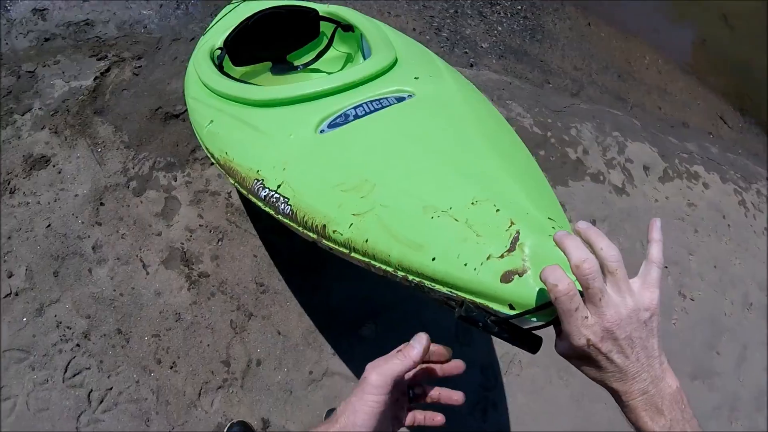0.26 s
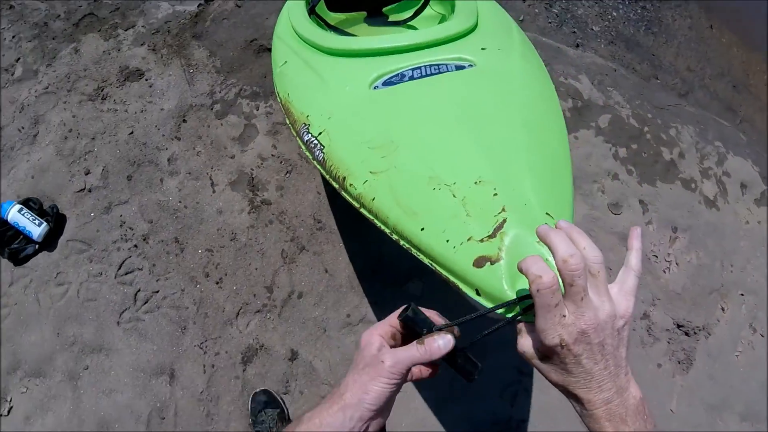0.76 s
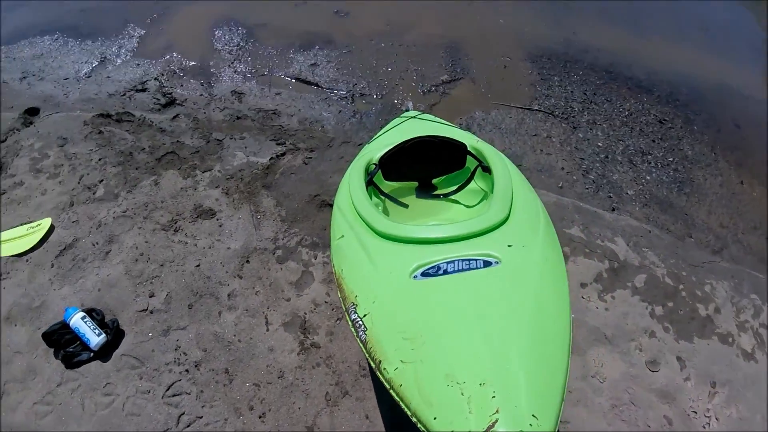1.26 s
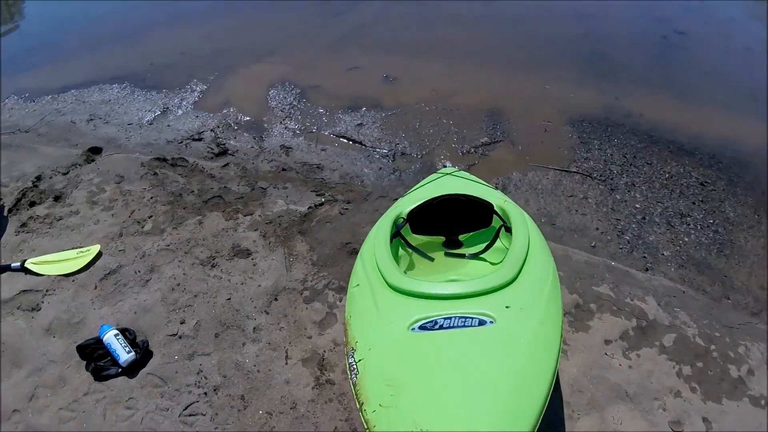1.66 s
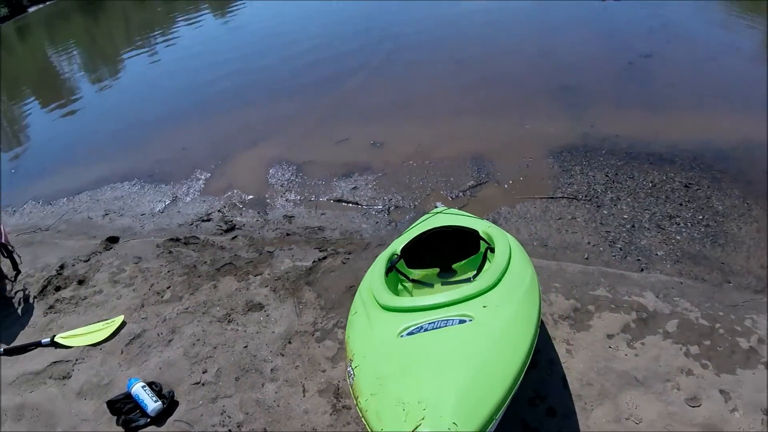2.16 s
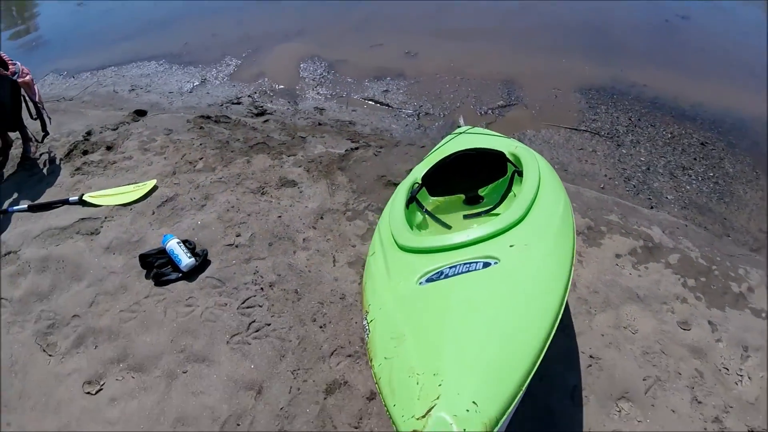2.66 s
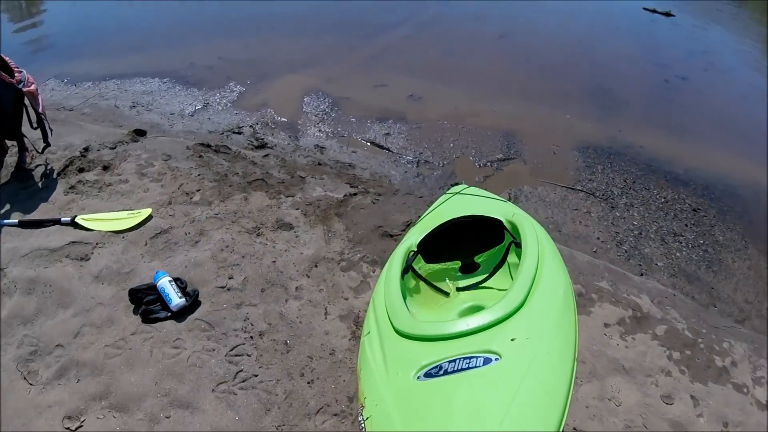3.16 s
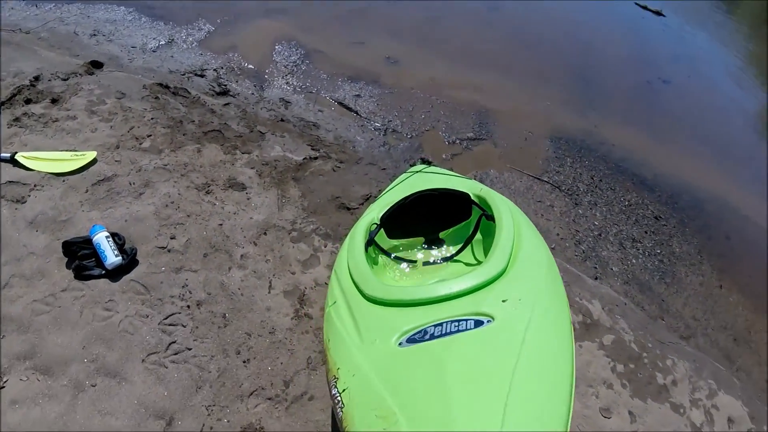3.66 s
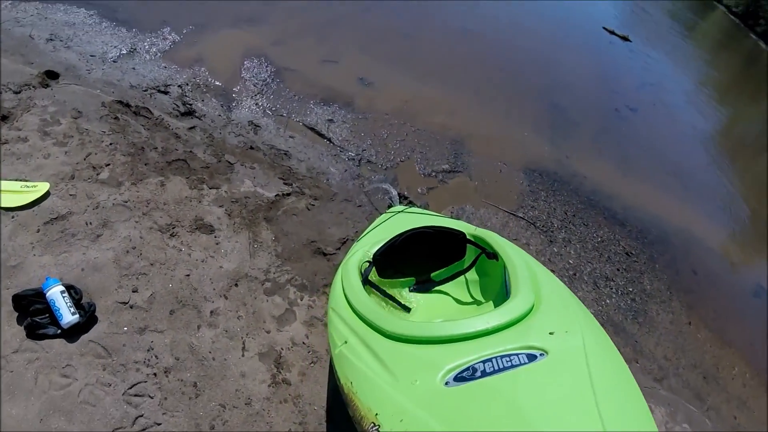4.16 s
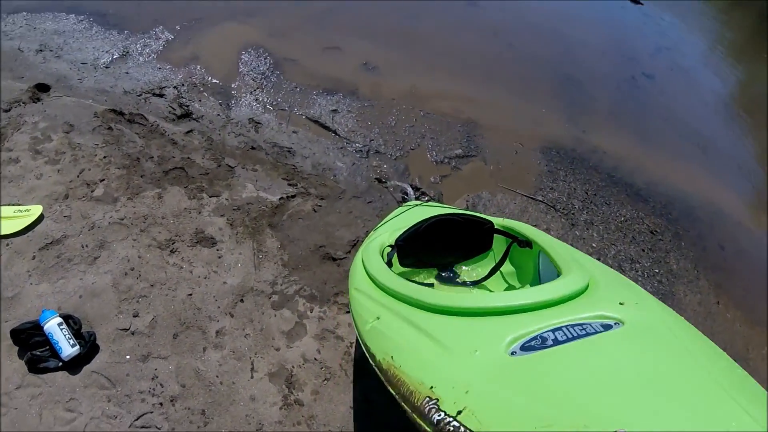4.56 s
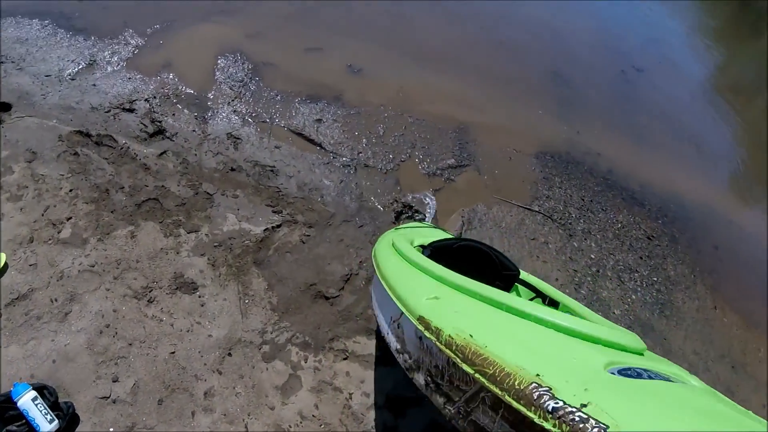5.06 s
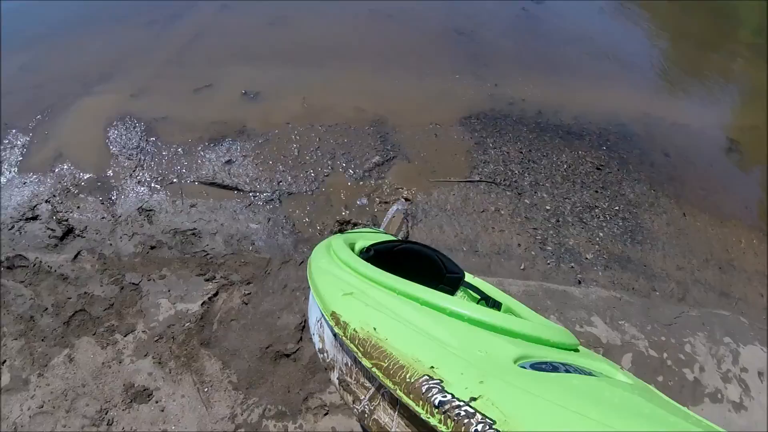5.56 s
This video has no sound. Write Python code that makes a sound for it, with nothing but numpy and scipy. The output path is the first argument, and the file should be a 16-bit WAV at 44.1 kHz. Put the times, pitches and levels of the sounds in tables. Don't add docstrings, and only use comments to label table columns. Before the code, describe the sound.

Quiet drips and soft wind give way to sharp hollow plastic knocks, short sand hisses and a patter of water off a boat hull.

```python
import sys
import numpy as np
from scipy import signal
from scipy.fft import rfft, irfft, next_fast_len
from scipy.io import wavfile
from scipy.ndimage import map_coordinates

SR = 44100
rng = np.random.default_rng(int(sys.argv[2]) if len(sys.argv) > 2 else 0)


def unload_audio(sound):
    columns = np.transpose(np.atleast_2d(sound))
    steps = np.round(np.clip(columns, -1, 1) * 32767)
    wavfile.write(sys.argv[1], SR, steps.astype(np.int16))


def gain_from_decibels(decibels):
    exponent = np.asarray(decibels, float) / 20
    return 10 ** exponent


N = 255824
TIME = np.arange(N) / SR

# start in seconds, length in seconds, grit in dB, groan over grit in dB.
SLIDES = [(1.9, .01, -70, 5), (2.625, .26, -44.5, -4), (3.094, 0.011, -46.5, -1.5), (3.204, 0.12, -51, 1.5),
          (3.401, 0.034, -54.5, 9.5), (3.492, 0.023, -47, -16), (3.608, 0.16, -70, 18.5),
          (3.864, 0.023, -52.5, -1), (4.095, 0.019, -56, 7), (4.246, 0.061, -45.5, 0),
          (4.376, .14, -50, 8.5), (4.58, 0.054, -49, 3), (4.742, 0.07, -52, -24), (4.9, 0.072, -58.5, 10),
          (5.02, 0.057, -58, 3.5), (5.156, 0.071, -54.5, 1), (5.334, 0.11, -51.5, 2),
          (5.501, 0.056, -52.5, 7.5), (5.64, .2, -55.5, -7)]
# frequency in Hz, density in dB per Hz.
GRIT_COLOUR = [(200, -42), (500, -33), (1000, -3.5), (2300, 5), (3000, 1.5), (4000, 3.5), (6000, -3.5),
               (9000, -9.5), (15000, -19)]
# frequency in Hz, density in dB per Hz.
GROAN_COLOUR = [(100, -27), (250, 5), (550, -4), (1000, -4.5), (2000, -10.5), (5000, -45)]
# start in seconds, peak in dB, crack in dB.
BLOWS = [(0.023, -40, -5), (2.917, -31, -23.5), (3.086, -31, -16), (3.208, -37.5, -5), (3.3765, -35, -16.5),
         (3.418, -33, -42), (3.482, -35, -6), (3.543, -35, -19), (3.6416, -11.5, -1.5),
         (3.6455, -15, -16.5), (3.653, -19, -7), (3.664, -24.5, -14), (3.755, -32, -23.5),
         (3.861, -28.5, -20.5), (3.874, -26.5, -18.5), (4.0028, -21, -14.5), (4.011, -32, -12),
         (4.105, -21.5, -19), (4.27, -24.5, -21), (4.314, -22.5, -23.5), (4.359, -21, -20.5),
         (4.399, -20.5, -18.5), (4.419, -28.5, -27.5), (4.493, -33.5, -35), (4.615, -24.5, -16),
         (4.629, -33.5, -18), (4.78, -23.5, -14), (5.1413, -24.5, -10), (5.2016, -23.5, -23),
         (5.497, -38, -5)]
# pitch in Hz, width in Hz, level in dB.
HULL_MODES = [(230, 117, -3.5), (321, 22.7, 8), (452, 108, 2), (605, 73, 4.5), (733, 91, 0.5),
              (1126, 310, -2.5), (1347, 89, 2.5), (1800, 330, -7.5), (2320, 590, -8.5), (4070, 1350, -12.5)]
# start in seconds, peak in dB, pitch in Hz.
CLEAR_DRIPS = [(0.0616, -41, 2130), (0.1166, -37.5, 2200), (0.1414, -41, 2190), (0.223, -35.5, 3880),
               (0.289, -44, 2760), (0.415, -39, 3500), (0.7696, -39, 3680), (0.817, -40, 1710),
               (0.8748, -31.5, 3000), (0.9154, -41, 2550), (1.077, -38, 3540), (1.7987, -38.5, 3400),
               (1.8118, -39, 2620), (3.306, -31, 2250), (4.1926, -31.5, 1830), (4.4963, -31, 1990),
               (4.62, -28, 2700), (4.65, -28, 2750), (4.9716, -33, 2050), (5.0474, -33.5, 2920),
               (5.0744, -26.5, 3200), (5.1678, -28, 3430), (5.2615, -31, 3700), (5.3672, -29.5, 2200),
               (5.45, -28, 3330), (5.4979, -28, 2620), (5.5796, -28, 3050), (5.6168, -26.5, 3350),
               (5.6605, -29.5, 1450), (5.699, -28.5, 2150)]
# start in seconds, peak in dB, pitch in Hz.
FINE_DROPS = [(0.2952, -41, 4300), (0.4623, -45, 3450), (0.5112, -40.5, 3500), (0.75, -39.5, 4400),
              (1.1313, -43, 2500), (1.3239, -40, 3140), (0.889, -38, 4300), (0.036, -40, 4570),
              (1.8926, -43, 3280), (3.0878, -28.5, 5930), (3.4148, -33, 1800), (5.1835, -36, 1540),
              (5.2075, -38, 2600), (0.486, -44, 3700), (1.33, -42.5, 4800), (3.214, -32, 3300),
              (3.486, -36, 3200), (4.2028, -37.5, 3430), (4.6693, -36.5, 3800), (4.7364, -31.5, 3670),
              (4.7582, -36, 2270), (5.3877, -33, 3730), (5.4216, -33, 3440), (5.467, -29.5, 3600),
              (5.5164, -32, 6400), (5.636, -44, 3200), (5.672, -42, 3500), (5.737, -34, 2360),
              (5.7643, -36, 3380), (5.7723, -36, 6500)]
# start in seconds, peak in dB, pitch in Hz, life in cycles.
CASE_PINGS = [
    (5.366, -25, 10600, 22),
    (5.465, -32, 8000, 18),
    (1.155, -36, 11500, 20),
]
# time in seconds, bubble peak in dB.
TRICKLE_FLOW = [(0, -44), (.55, -46), (1.4, -48.5), (2.2, -53.5), (3, -59), (3.3, -44.5), (3.7, -49),
                (4.4, -44.5), (4.65, -40), (4.9, -46), (5.3, -43), (5.5, -38), (5.68, -34.5), (5.8, -41)]
# start in seconds, length in seconds, level in dB.
HULL_HEAVES = [
    (.55, .5, -58.5),
    (2.68, 0.057, -43),
    (3.2, 0.11, -46),
    (3.64, 0.071, -45.5),
    (3.86, 0.051, -36.5),
    (4.28, 0.12, -43),
    (4.55, 0.08, -44.5),
    (4.8, 0.76, -48),
    (5.62, .1, -57),
]
# frequency in Hz, density in dB per Hz.
BOOM_COLOUR = [(40, -18), (70, -0.5), (116, 2.5), (160, -5), (240, -12), (400, -34.5), (900, -86)]
# start in seconds, length in seconds, level in dB.
WIND_PUFFS = [(0, 0.048, -34), (.08, 0.13, -44), (.29, 0.08, -42.5), (.6, 0.089, -46.5),
              (.83, 0.063, -43.5), (1.09, 0.13, -41), (1.38, 0.048, -43), (1.58, .18, -47),
              (1.89, 0.17, -47), (2.38, 0.02, -39.5), (2.53, 0.39, -41.5), (3.45, 0.13, -51),
              (4.33, .08, -55), (5, .5, -51), (5.76, .04, -54)]
# frequency in Hz, density in dB per Hz.
BUFFET_COLOUR = [(15, -11), (25, 4.5), (45, 2.5), (70, -4), (110, -18.5), (300, -35), (600, -94)]
# centre in seconds, peak in dB, width in seconds.
PRESSURE_DIPS = [
    (2.745, -26.5, 0.0081),
    (3.884, -43, 0.003),
]
# frequency in Hz, density in dB per Hz.
RIVER_COLOUR = [(150, -4), (250, -4), (400, -7), (1100, -6), (2200, -13.5), (3700, -16.5), (4400, -22.5),
                (5600, -25.5), (6450, -15.5), (7100, -20.5), (8800, -23.5), (10300, -32), (11200, -30),
                (13000, -30.5), (14400, -49)]
# frequency in Hz, gain in dB.
CASE_TONE = [(20, 2.5), (4000, -1), (4900, -5.5), (5800, 0.5), (6400, 6.5), (7000, -7.5), (8300, -9.5),
             (10300, -16), (11000, -5.5), (12000, -37), (16000, -50)]


def drag():
    timing = dict(rise_s=0.016, rise_share=1.84, fall_s=0.075)
    slide = swells([row[:3] for row in SLIDES], rest_db=-63, **timing)
    groan_rows = [(s, length, db + more_db) for s, length, db, more_db in SLIDES]
    load = swells(groan_rows, rest_db=-54, **timing)
    moving = np.clip((TIME - 1.9) / 0.39, 0, 1)
    grit = slide * rush(GRIT_COLOUR, lumps_db=0.8, rate=70, spiky=2.5)
    groan = gain_from_decibels(-2) * load * rush(GROAN_COLOUR, lumps_db=1.5, rate=35, spiky=3.0)
    return moving * (grit + groan) + pebble_slips(load)


def pebble_slips(load):
    chance = rng.random((1000, 4))
    s = 2.9 + 2.85 * chance[:, 0]
    db = 20 * np.log10(load[(s * SR).astype(int)]) + 2 - 3 * np.log(chance[:, 1] + 0.03)
    pitch = 350 * 8 ** chance[:, 2]
    cycles = 2.5 + 5 * chance[:, 3]
    return bubbles(s, db - 4 * np.log2(pitch / 500), pitch, cycles, 0 * s)


def knocks():
    out = np.zeros(N + SR)
    t = np.arange(SR // 6) / SR
    for s, db, crack_db in BLOWS:
        body = hull_ring(t, crack_db)
        contact_s = 0.001 * gain_from_decibels(-0.35 * (crack_db + 10.5))
        contact_db = np.minimum(2 + 0.35 * (crack_db + 6), 4)
        contact = -gain_from_decibels(contact_db) * np.sin(2 * np.pi * np.minimum(t / contact_s, 1))
        crack = rng.standard_normal(len(t)) * (gain_from_decibels(-60 * t / 0.0048) + 0.02 * gain_from_decibels(-60 * t / 0.013))
        crack[:4] = [-2, -3, 1, 3]
        blow = body / np.abs(body).max() + contact + gain_from_decibels(crack_db + 3.5) * crack
        out[round(s * SR) + 50:][:len(t)] += gain_from_decibels(db) * blow
    return out[:N]


def hull_ring(t, crack_db):
    ring_s = 0.091
    ragged = rng.standard_normal(len(t)) * gain_from_decibels(3.5 * np.repeat(rng.standard_normal(len(t) // 50), 50))
    push_level = 1.82 * gain_from_decibels(-2.3 * (crack_db + 20))
    push = -push_level * np.sin(np.pi * np.minimum(t / 0.00039, 1))
    body = np.zeros(len(t))
    for k, (centre, width, db) in enumerate(HULL_MODES):
        decay = gain_from_decibels(-60 * t / ring_s * (centre / 700) ** 0.23)
        rattle = 1.01 * ragged * np.minimum(t / 0.002, 1) * decay
        gain = (-1) ** k * gain_from_decibels(db + rng.normal(0, 2.13))

        def mode(hz):
            return gain * 1j * hz * width / (centre ** 2 - hz ** 2 + 1j * hz * width)

        body += filtered(push + rattle, mode)
    return body


def water():
    return drips() + spray() + shaken_off() + trickle()


def drips():
    s, db, hz = np.transpose(CLEAR_DRIPS)
    chance = rng.random((len(s), 2))
    ring = bubbles(s, db + 0.5, hz, 13.7 * (0.7 + 0.6 * chance[:, 0]), 0.3 * chance[:, 1])
    slap = bubbles(s - 0.001, db - 1, 1.45 * hz, 2 + 0 * s, 0 * s)
    return ring + slap


def spray():
    s, db, hz = np.transpose(FINE_DROPS)
    chance = rng.random((len(s), 2))
    drops = bubbles(s, db + 7, hz, 3 + 8 * chance[:, 0], 0.69 * chance[:, 1])
    return drops + bubbles(*np.transpose(CASE_PINGS), np.zeros(len(CASE_PINGS)))


def shaken_off():
    s, db, crack_db = np.transpose(BLOWS)
    chance = rng.random((len(s), 4))
    drip_hz = 1600 * (0.81 + 0.5 * chance[:, 0])
    drip = bubbles(s + 0.00292, db - 5, drip_hz, 5 + 0 * s, 0.42 * chance[:, 1])
    drop_hz = 3500 * (0.79 + 0.13 * chance[:, 2])
    drop_db = db + crack_db / 2 + 3
    return drip + bubbles(s + 0.00198, drop_db, drop_hz, 3 + 6 * chance[:, 3], 0.3 * chance[:, 1])


def trickle():
    flow_db = np.interp(TIME, *np.transpose(TRICKLE_FLOW))
    rate = 300 * gain_from_decibels(0.9 * (flow_db + 45))
    start = np.nonzero(np.diff(np.floor(np.cumsum(rate / SR))))[0]
    chance = rng.random((len(start), 5))
    scatter = (chance[:, 0] - 0.5) * 6 * SR / rate[start]
    start = np.clip(start + scatter, 0, N - 1).astype(int)
    tick = chance[:, 4] < 0.55
    pitch = 1200 * 3.7 ** chance[:, 1] * np.where(tick, 1.5, 1)
    db = flow_db[start] - 2.6 * np.log(chance[:, 2] + 0.03) + 2 * tick
    cycles = np.where(tick, 2 + 2 * chance[:, 3], 3 + 9 * chance[:, 3] ** 2)
    return bubbles(start / SR, db, pitch, cycles, 0.9 * chance[:, 4] ** 3)


def boom():
    gain = swells(HULL_HEAVES, rest_db=-49.5, rise_s=0.01, rise_share=0.12, fall_s=0.1)
    return gain * rush(BOOM_COLOUR, lumps_db=1.0, rate=30)


def wind():
    gain = swells(WIND_PUFFS, rest_db=-50.5, rise_s=0.022, rise_share=0.12, fall_s=0.077)
    out = gain * rush(BUFFET_COLOUR, lumps_db=1.5, rate=6.4)
    for s, db, width in PRESSURE_DIPS:
        x = ((TIME - s) / width) ** 2
        out -= gain_from_decibels(db) * (1 - 2 * x) * np.exp(-x)
    return out


def river():
    return gain_from_decibels(-52 + 0.38 * wobble(4.0)) * rush(RIVER_COLOUR, lumps_db=1.45, rate=25)


def housing(x):
    gain = gain_from_decibels(along(CASE_TONE, np.fft.rfftfreq(4096, 1 / SR)))
    cepstrum = irfft(np.log(gain))
    cepstrum[1:2048] *= 2
    cepstrum[2049:] = 0
    return signal.fftconvolve(x, irfft(np.exp(rfft(cepstrum))))[:N]


def bubbles(s, db, hz, cycles, rise):
    t = np.arange(SR // 40) / SR
    age = t * (hz / np.clip(cycles, 1, 40))[:, None]
    turns = hz[:, None] * t * (1 + rise[:, None] * np.minimum(age, 1) / 2)
    envelope = np.exp(-2.5 * age) * (1 - np.exp(-12 * age))
    wave = gain_from_decibels(db)[:, None] * np.sin(2 * np.pi * turns) * envelope
    index = np.round(s * SR).astype(int)[:, None] + np.arange(len(t))
    return np.bincount(index.ravel(), wave.ravel(), N + SR)[:N]


def swells(rows, rest_db, rise_s, rise_share, fall_s):
    gain = np.full(N, gain_from_decibels(rest_db))
    for s, length, db in rows:
        rising = (TIME - s) / (rise_s + rise_share * length) + 1
        falling = (s + length - TIME) / fall_s + 1
        gain += gain_from_decibels(db) * np.clip(np.minimum(rising, falling), 0, 1) ** 2
    return gain


def rush(spectrum, lumps_db, rate, spiky=0.0):
    grains = np.minimum(rng.exponential(size=N), 6)
    hail = rng.standard_normal(N) * gain_from_decibels(spiky * grains + lumps_db * wobble(rate))
    noise = filtered(hail, lambda hz: gain_from_decibels(along(spectrum, hz)))
    return noise / np.sqrt(np.mean(noise ** 2) + 1e-20)


def wobble(rate):
    return map_coordinates(rng.standard_normal(int(N * rate / SR) + 4), [np.arange(N) * rate / SR])


def along(points, hz):
    f, value = np.transpose(points)
    return np.interp(np.log(hz + 1), np.log(f + 1), value)


def filtered(x, response):
    m = next_fast_len(len(x) + 8192)
    return irfft(rfft(x, m) * response(np.fft.rfftfreq(m, 1 / SR)), m)[:len(x)]


def scene():
    near = housing(drag() + knocks() + water())
    return (near + boom() + wind() + river())[None]


def top_cut(x):
    return signal.sosfilt(signal.butter(12, 14300, fs=SR, output="sos"), x)


def record(dry):
    return top_cut(dry)


dry = scene()
out = record(dry)
unload_audio(out)
```